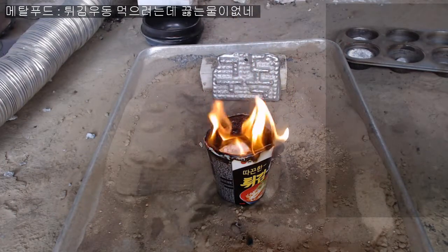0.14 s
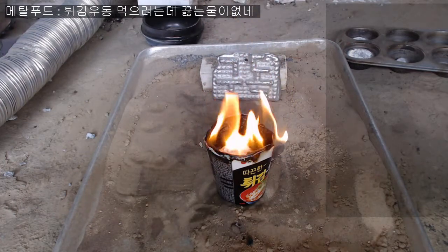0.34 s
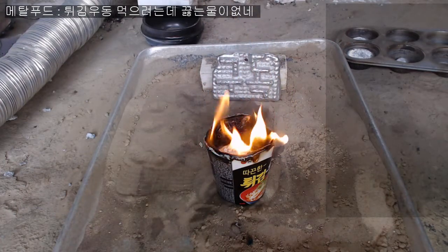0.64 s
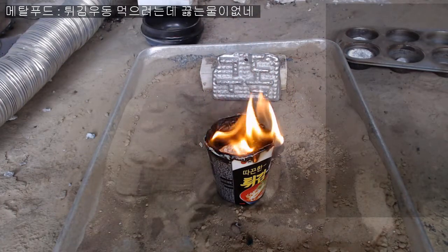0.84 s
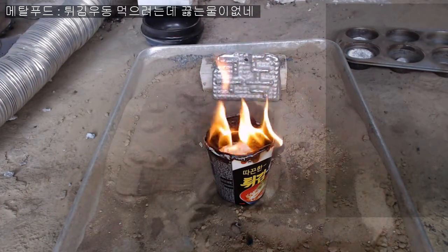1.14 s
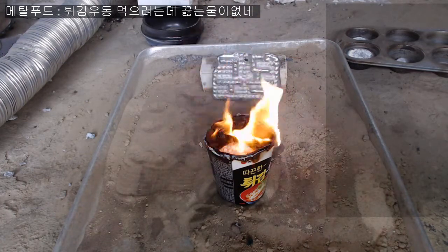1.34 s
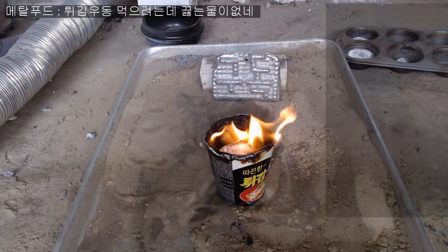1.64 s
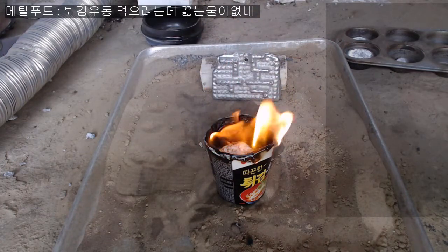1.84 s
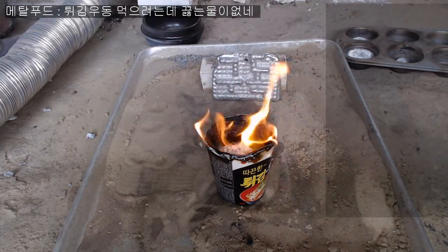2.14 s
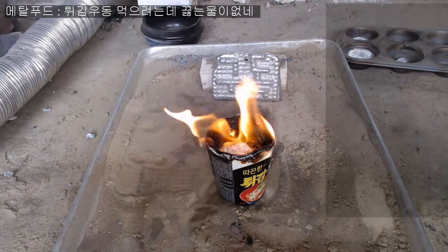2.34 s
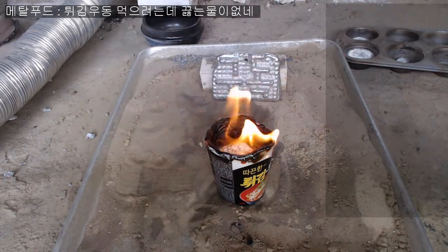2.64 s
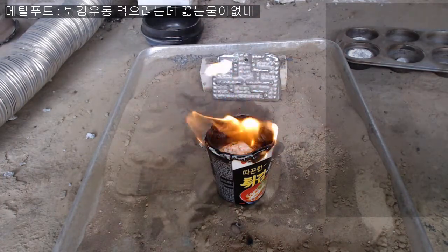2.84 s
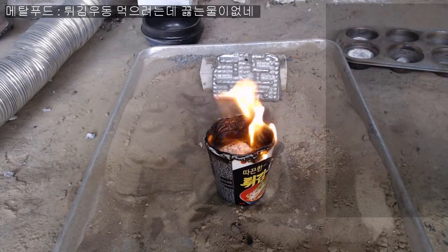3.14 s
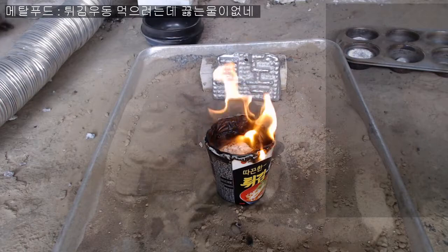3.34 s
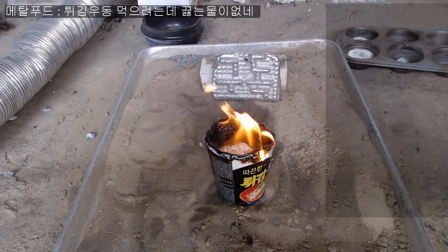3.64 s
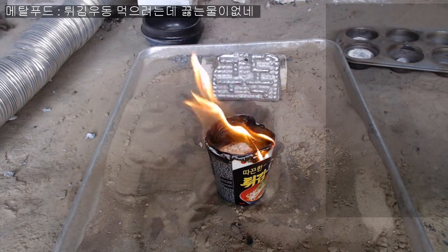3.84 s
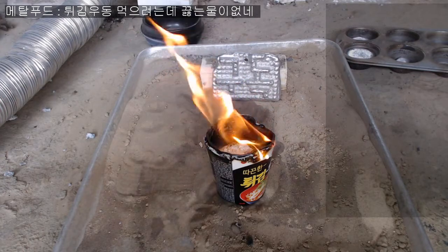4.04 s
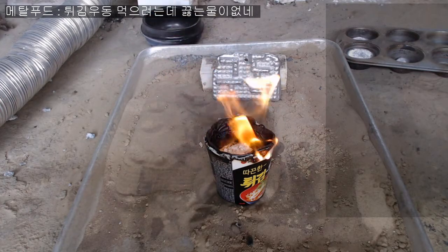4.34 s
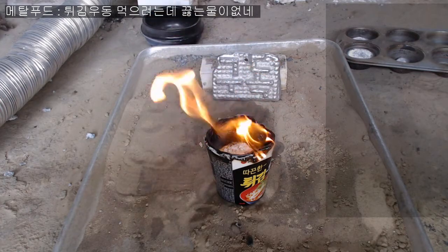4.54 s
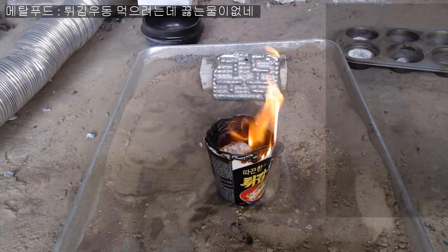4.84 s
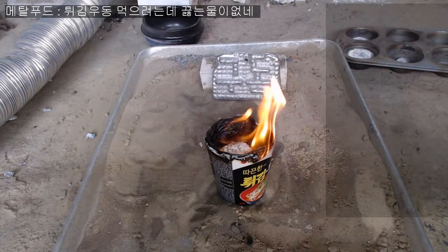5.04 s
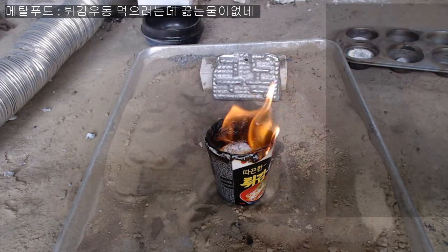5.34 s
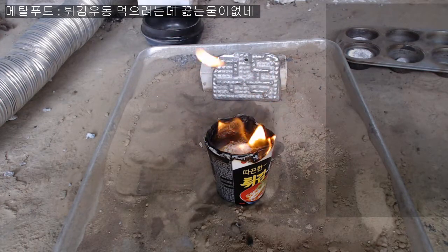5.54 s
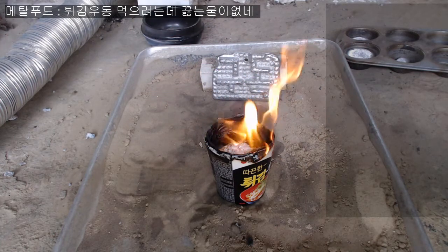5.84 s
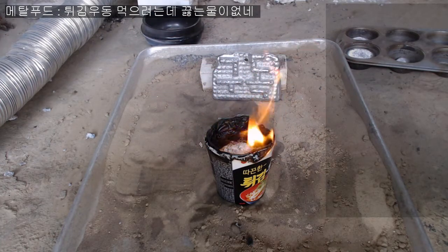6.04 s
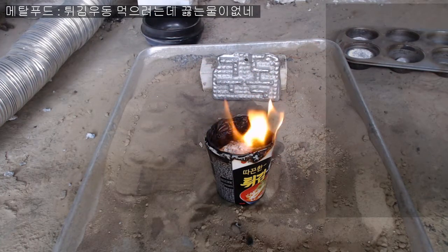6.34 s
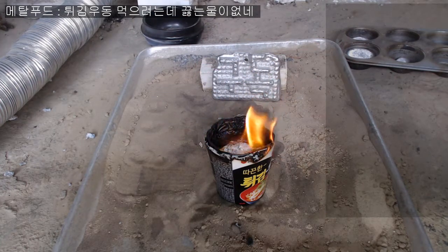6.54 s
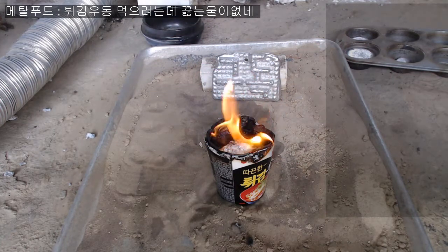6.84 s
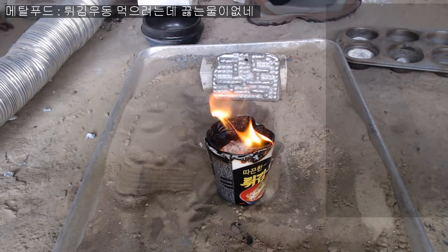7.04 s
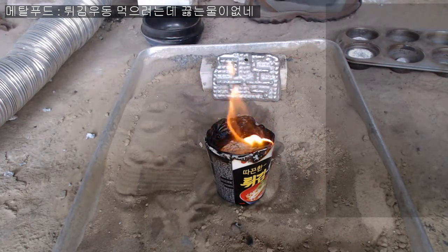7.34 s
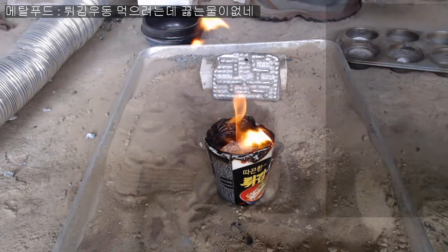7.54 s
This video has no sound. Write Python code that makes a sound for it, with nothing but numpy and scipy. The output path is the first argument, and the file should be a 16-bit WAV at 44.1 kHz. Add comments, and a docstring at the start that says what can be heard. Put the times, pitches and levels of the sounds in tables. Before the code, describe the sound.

Close hollow scraping and knocking gives way to scattered pops of burning paper, soft sandy footsteps and rattling tongs in a shed.

```python
"""A hollow vessel scrapes and bumps close by, its body ringing as it sticks and slips on the ground.
Then, off to one side, metal tongs rattle and clank, and shoes crunch as they press on sand.
A paper cup of molten metal burns in a sand tray, ticking and snapping as its fibres burst.
Behind it all are the steady noise of a shed, a mains hum, a low rumble and one faint falling whistle.
The shed walls add a short echo."""
import sys
import numpy as np
from scipy import signal
from scipy.fft import rfft, irfft
from scipy.io import wavfile
from scipy.ndimage import uniform_filter1d

SR = 44100
rng = np.random.default_rng(int(sys.argv[2]) if len(sys.argv) > 2 else 0)


def unload_audio(sound):
    """Save the sound as a 16-bit wav file, at the path given as the first command line argument."""
    columns = np.transpose(np.atleast_2d(sound))
    # keep every value between -1 and 1, then stretch to whole-number steps
    steps = np.round(np.clip(columns, -1, 1) * 32767)
    wavfile.write(sys.argv[1], SR, steps.astype(np.int16))


N = 339129
T = np.arange(N) / SR

# How loud the dragging is (time [s], level [dB])
DRAG_LEVELS = [(0.0, -17), (0.142, -39.5), (0.212, -25.5), (0.292, -43), (0.662, -31.5), (0.942, -39.5),
               (0.988, -23.5), (1.04, -33), (1.102, -29.5), (1.182, -42), (1.296, -52), (1.392, -35),
               (1.7, -75.5)]
# Notes of the hollow body (pitch [Hz], width [Hz], level [dB])
BODY_NOTES = [(192, 57, -10.5), (289.7, 15, -1), (387, 53, -5), (433.2, 12.8, 3.5), (531.8, 21, 1),
              (666, 29, -9.5), (672, 38, -5.5), (909, 54, -13.5), (998, 21, -10), (1172, 130, -20),
              (1427, 15, -20)]
# Tone of the scraping hiss (frequency [Hz], level [dB])
SCRAPE_TONE = [(760, -42.5), (1300, -1), (1390, -1.5), (2370, -5.5), (2780, -3.5), (4340, -9.5), (5210, -8),
               (7000, -10.5), (9100, -42), (15400, -120)]
# The rim catches on the ground (time [s], level [dB], fade time [s], favoured pitch [Hz])
RIM_CATCHES = [(0.199, -45.5, 0.11, 1750), (0.341, -52.5, 0.4, 5800), (.347, -56, 0.99, 1360),
               (0.489, -51.5, 0.16, 5630), (0.5107, -46, 0.14, 2300), (0.621, -48, 0.39, 5300),
               (0.658, -54.5, 0.25, 2300), (0.841, -49, 0.24, 2300), (0.9733, -36.5, 0.21, 5200),
               (1.1734, -53, 0.22, 1790), (1.35, -48.5, 0.2, 1450)]
# Notes of the rim (pitch [Hz], width [Hz], level [dB])
RIM_NOTES = [(1400, 110, 15), (1750, 120, 14), (2350, 140, 15), (5150, 200, 12), (5800, 170, 12),
             (6400, 170, 14)]
def vessel_drag():
    """Sticking and slipping shakes the hollow body; the rim hisses, catches and rings briefly."""
    stop = np.clip((DRAG_LEVELS[-1][0] - T) / 0.081, 0, 1)
    slips = grains(per_s=3000, spread_db=1.8)
    body = unit(sum((-1) ** k * undb(db) * band(slips, hz, width)
                    for k, (hz, width, db) in enumerate(BODY_NOTES)))
    hiss = unit(colour(grains(6000, 0.54), SCRAPE_TONE))
    out = stop * loudness(DRAG_LEVELS) * (body + undb(-24) * hiss)
    for s, db, fade_s, favoured_hz in RIM_CATCHES:
        at, envelope = swell(s, 0.0018, fade_s)
        rings = 0
        for hz, width, note_db in RIM_NOTES:
            octaves_away = np.log2(hz / favoured_hz)
            rings += undb(note_db - 6.7 * (octaves_away / 0.22) ** 2) * band(hiss[at], hz, width)
        out[at] += undb(db) * envelope * (1.3 * hiss[at] + rings)
    return out


# Knocks on the vessel (time [s], level [dB], favoured pitch [Hz], deep note's relative level [dB])
VESSEL_BUMPS = [(0.014, -21.5, 434, -15.5), (0.045, -14.5, 511, -32), (0.167, -23.5, 434, -18),
                (0.201, -17.5, 434, -10.5), (0.239, -24, 434, -11.5), (0.393, -35, 495, -1.5),
                (0.435, -28.5, 434, -11), (0.512, -22.5, 434, -20), (0.583, -17, 511, -35),
                (0.623, -30.5, 514, -19), (0.659, -20.5, 434, -5), (0.707, -29.5, 511, -19),
                (0.779, -26, 434, -26), (0.973, -25, 434, -18), (0.994, -38, 434, -9),
                (1.054, -34.5, 511, 6), (1.085, -21, 434, 3), (1.11, -26.5, 434, 6.5),
                (1.272, -33, 368, -5), (1.298, -31.5, 370, -1), (1.352, -30, 366, -3),
                (1.384, -33.5, 365, -5)]
def vessel_bumps():
    """A soft bump rings the body's notes nearest the favoured pitch, plus one deep note."""
    out = np.zeros(N)
    for s, db, favoured_hz, deep_db in VESSEL_BUMPS:
        at, envelope = swell(s, rise_s=0.0036, fade_s=0.091, hold_s=0.0072)
        turn = 2 * np.pi * (T[at] - s)
        rings = sum(np.exp(-((hz - favoured_hz) / 35) ** 2) * np.sin(hz * turn)
                    for hz in (367, 435.5, 517))
        out[at] += undb(db) * envelope * (rings + undb(deep_db) * np.sin(295.6 * turn))
    return out


# Hits of the tongs (time [s], level [dB], clash fade time [s], boosted pitch [Hz])
TONG_CLANKS = [(1.95, -16.5, 0.12, 4560), (2.005, -34, 0.17, 5030), (5.365, -7.5, 0.14, 3940),
               (5.3808, -15, 0.18, 6400), (5.4065, -23, 0.15, 5030), (5.596, -2.5, 0.051, 3570),
               (5.613, -10, 0.14, 5800), (5.6417, -15, 0.14, 4630), (5.8006, -9, 0.097, 5050),
               (5.814, -18.5, 0.24, 6600), (5.862, -25, 0.15, 4300), (6.108, -24.5, 0.16, 3300),
               (6.137, -31.5, 0.19, 3900)]
# Notes of the tongs (pitch [Hz], level [dB], fade time before damping [s])
TONG_NOTES = [(2300, -14, .17), (3240, -12, .12), (3360, -10, .19), (3640, -12, .2), (3924, -13, .25),
              (4035, -10, .2), (4160, -13, .19), (4620, -13, .25), (5010, -8, .2), (5052, -5, .12),
              (5206, -11, .16), (5680, -8, .2), (5720, -3, .13), (5900, -6, .17), (6290, -5, .13),
              (6492, -10, .17), (6686, -3, .1), (6890, -12, .2), (7230, -17, 1.4), (11200, -17, .6)]
# Tone of the noisy clash (frequency [Hz], level [dB])
CLASH_TONE = [(180, -52), (300, -16), (366, -27.5), (688, -17.5), (1520, -16.5), (2280, -18.5),
              (2570, -11.5), (5380, -10.5), (5670, -16.5), (7000, -9.5), (9100, -34), (15400, -120)]
def tongs(damping=0.49):
    """Each clank is a quick rattle of metal on metal: clear ringing notes inside a noisy clash."""
    notes, clash_level = np.zeros((2, N))
    rattle = grains(3500, 0.37)
    # where the tongs are struck sets each note's share
    shares_db = 4 * rng.standard_normal((len(TONG_CLANKS), len(TONG_NOTES)))
    for (s, db, fade_s, boosted_hz), shares in zip(TONG_CLANKS, shares_db):
        at, envelope = swell(s, 0.00035, fade_s, hold_s=0.009)
        clash_level[at] += undb(db) * envelope
        at, envelope = swell(s, 0.00059, 0.58)
        hits = envelope ** 30 * rattle[at]  # the power cuts the rattle short
        for (hz, note_db, ring_s), share_db in zip(TONG_NOTES, shares):
            boost_db = 8 * np.exp(-((hz - boosted_hz) / 500) ** 2)
            notes[at] += undb(db + note_db + share_db + boost_db) * ring(hits, hz, damping * ring_s)
    weak_hz = rng.uniform(1200, 8000, 60)  # many weaker notes make the clash metallic
    clashes = []
    for k in range(3):
        noise = colour(grains(12000, 1.0), CLASH_TONE)
        shimmer = sum(band(noise, hz, 32) for hz in weak_hz[k::3])
        clashes.append(clash_level * unit(noise + 1.67 * shimmer))
    shared, left, right = clashes
    notes -= band(notes, 600, 1700)  # thin out the low tones
    placed = stereo(undb(-34.5) * notes + undb(-15) * shared, lag=8.6, left_db=-.3)
    # the long tool sounds from many spots, so left and right partly differ
    return placed + undb(-14.5) * np.array([left, right])


# Shoes on sand (time [s], crunch level [dB], crunch pitch [Hz], thud level [dB],
# thud pitch [Hz], press length [s])
FOOTSTEPS = [(2.067, -55, 1160, -60, 302, 0), (2.294, -51.5, 990, -56, 377, 0.052),
             (2.41, -65, 900, -55, 202, 0), (2.569, -69.5, 556, -54, 218, 0.16),
             (2.717, -42, 830, -43.5, 190, 0.0034), (2.753, -59.5, 695, -44.5, 306, 0.04),
             (2.828, -58.5, 1360, -48, 315, 0.042), (3.679, -57.5, 1160, -43.5, 330, 0.017),
             (3.721, -44, 1200, -42.5, 360, 0.023), (3.762, -55.5, 2140, -50, 355, 0.015),
             (4.04, -62, 666, -49, 409, 0.055), (4.111, -58, 950, -49.5, 280, 0.026),
             (4.285, -53, 670, -36, 186, 0.019), (4.566, -62, 724, -71, 298, 0.0029),
             (4.862, -84, 960, -49.5, 200, .01), (5.742, -71, 800, -53, 106, .01),
             (6.015, -56.5, 830, -45.5, 117, 0.083), (6.058, -58.5, 1200, -46, 270, 0.09),
             (6.843, -53, 885, -32, 169, 0), (6.857, -54.5, 950, -41, 96.6, 0.01),
             (6.885, -50.5, 1300, -45.5, 94, 0.079), (6.991, -38, 2400, -34, 430, 0),
             (7.162, -60, 2640, -62, 97, 0.077), (7.413, -65, 600, -52, 299, 0.072),
             (7.55, -56, 1710, -59, 97, 0.027)]
def footsteps():
    """A sole presses sand: a rough thud, a coarse crunch as the weight comes down, and fine grit."""
    coarse = grains(3500, 1.1)
    crunch = unit(band(coarse, 1600, 2140))
    grit = unit(band(grains(6700, 7.8), 3000, 3600))
    lumps = unit(band(grains(600, 0.96), 206, 350))
    sand = 0.71 * crunch + undb(-10) * grit
    out = np.zeros(N)
    for s, db, hz, thud_db, thud_hz, press_s in FOOTSTEPS:
        at, envelope = swell(s, 0.0005, 0.12, press_s)
        own_crunch = unit(band(band(coarse[at], hz, 0.94 * hz), hz, 2.2 * hz))
        out[at] += undb(db) * envelope * (sand[at] + own_crunch)
        at, envelope = swell(s, 0.0024, 21 / thud_hz)  # fades in 21 cycles
        thud = 0.83 * lumps[at] - np.sin(2 * np.pi * thud_hz * (T[at] - s))
        out[at] += undb(thud_db) * envelope * thud
    return out


# Loudest snaps of the burning paper (time [s], level [dB], pitch [Hz])
PAPER_SNAPS = [(2.376, -43, 4780), (2.4935, -38, 3270), (2.7218, -34.5, 3640), (2.7547, -39.5, 6050),
               (2.8333, -36, 5560), (3.0006, -43, 5850), (3.1103, -44, 6110), (3.1579, -26, 5600),
               (3.3462, -45, 5800), (3.4693, -30.5, 4460), (3.762, -32, 2950), (3.911, -27, 4370),
               (3.9215, -21, 2750), (3.9649, -44, 5060), (3.991, -32.5, 3400), (4.0782, -32.5, 6900),
               (4.6993, -45, 6800), (4.8685, -48, 5970), (6.01, -36, 6000), (6.024, -42, 3280),
               (6.545, -46, 7000), (6.7105, -43, 5500), (6.795, -35, 5100), (7.1826, -35.5, 3600),
               (7.3292, -39, 4280), (7.3478, -22, 2900), (7.5762, -35.5, 2780)]
def flame(ticks_per_s=50, length=400):
    """Paper fibres burst in dry cracks with a brief ring; many weaker ticks fall at random."""
    when, softness, pitch = rng.random((int(ticks_per_s * N / SR), 3)).T
    ticks = np.c_[when * T[-1], -52 - 9 * softness, 3500 + 4000 * pitch]
    bursts = np.vstack([PAPER_SNAPS, ticks])
    out, click = np.zeros(N + length), signal.unit_impulse(length)
    thin_noise = np.diff(rng.standard_normal((len(bursts), length + 1)))  # little bass
    splinters = thin_noise * undb(-60 * T[:length] / .007)
    for (s, db, hz), splinter in zip(bursts, splinters):
        crack = band(band(splinter, hz, 0.84 * hz), hz, 0.9 * hz)
        out[int(s * SR):][:length] += undb(db) * (0.93 * ring(click, hz, 3 / hz) + 1.78 * crack)
    return out[:N]


# Tone of the shed's steady noise (frequency [Hz], level [dB])
SHED_TONE = [(26, -30), (45, -4.5), (70, -8), (87, -15), (283, -19.5), (328, -17), (364, -21.5), (489, -18),
             (532, -18), (731, -23), (1290, -28.5), (7000, -40.5), (9100, -70), (15400, -120)]
# How alike left and right are (frequency [Hz], likeness [0 to 1])
SHED_LIKENESS = [(60, 1), (120, 1), (240, 0.77), (490, 1), (980, 0.097), (1960, 0.13), (3930, 0.19),
                 (7900, 0.49)]
def shed_noise():
    """A steady rush of noise bands, each flickering a little and partly alike on both sides."""
    out = 0
    for hz in 50 * 2 ** np.arange(0, 7.6, 1 / 3):
        alike = min(look_up(SHED_LIKENESS, hz), .99)
        mid, side = band(band(rng.standard_normal((2, N)), hz, hz / 3), hz, hz / 3)
        pair = np.sqrt(1 + alike) * mid + np.sqrt(1 - alike) * np.array([side, -side])
        out += undb(look_up(SHED_TONE, hz) + 1.2 * wander(6)) * pair
    return undb(-56.5) * unit(out)


def mains_hum(hz=59.5):
    """One low electrical tone that wavers in level and pitch."""
    level = undb(-56.5 + 0.79 * wander(9.5))
    return level * np.sin(2 * np.pi * np.cumsum(hz + 0.59 * wander(20)) / SR)


# Rumble at the microphone (time [s], left level [dB])
RUMBLE_LEVELS = [(0.0, -58), (0.19, -65.5), (0.62, -54.5), (1.56, -43), (1.63, -52.5), (1.82, -40),
                 (1.95, -58), (3.6, -61.5), (7.69, -62.5)]
def rumble():
    """Very deep noise that swells and sinks, stronger on the right."""
    sides = [undb(db) * unit(band(band(rng.standard_normal(N), 29, 39), 29, 39)) for db in (0, 4)]
    return loudness(RUMBLE_LEVELS) * np.array(sides)


def whistle(start_s=4.36, length_s=.38, hz=1510, fall_hz_per_s=270):
    """A faint, fluttering tone that slides down."""
    at, envelope = swell(start_s, 0.0092, 3.1)
    t, out = T[at] - start_s, np.zeros(N)
    level = undb(-69.5 + 2.9 * wander(24.7)[at]) * envelope * (t < length_s)
    out[at] = level * np.sin(2 * np.pi * t * (hz - fall_hz_per_s * t / 2))
    return out


def wall_echo(x, fade_s=.25):
    """The shed walls scatter sound into a short tail, different on each side."""
    t = T[:SR // 2]
    tail = rng.standard_normal((2, len(t))) * undb(-60 * t / fade_s) * (t > .004)
    tail /= np.sqrt(np.sum(tail ** 2) / 2)
    return undb(-12) * signal.fftconvolve(x[None], tail, axes=1)[:, :N]


def undb(db):
    """Turn decibels into a gain."""
    return 10 ** (np.asarray(db) / 20)


def unit(x):
    """Scale to an average (rms) strength of 1."""
    return x / np.sqrt(np.mean(x ** 2))


def loudness(table):
    """A gain that glides through (time [s], level [dB]) points."""
    return undb(np.interp(T, *np.transpose(table)))


def look_up(table, hz, top_hz=7000):
    """Read a table along a musical pitch scale; the value stays the same above top_hz."""
    frequencies, values = np.transpose(table)
    return np.interp(np.log(np.minimum(hz, top_hz) + 1), np.log(frequencies + 1), values)


def colour(x, table, top_hz=7000):
    """Shape the tone of x with a (frequency [Hz], level [dB]) table, read up to top_hz."""
    gain_db = look_up(table, np.linspace(0, SR / 2, 2049), top_hz)
    cepstrum = irfft(gain_db * np.log(10) / 20)
    # fold it so the filter never sounds ahead of its input
    cepstrum[1:2048] *= 2
    cepstrum[2049:] = 0
    return signal.lfilter(irfft(np.exp(rfft(cepstrum)))[:512], [1], x)


def band(x, hz, width_hz):
    """Keep the sound near one pitch."""
    return signal.lfilter(*signal.iirpeak(min(hz, .45 * SR), hz / width_hz, fs=SR), x)


def ring(x, hz, fade_s):
    """One note, struck by x, that fades by 60 dB in fade_s."""
    pole = np.exp(2j * np.pi * hz / SR - np.log(1000) / (fade_s * SR))
    return signal.lfilter([1], [1, -pole], x).imag


def wander(per_s):
    """A smooth random drift."""
    hold = int(SR / per_s)
    levels = np.repeat(rng.standard_normal(N // hold + 1), hold)
    return 2.08 * uniform_filter1d(uniform_filter1d(levels, hold), hold)[:N]


def grains(per_s, spread_db):
    """Scattered clicks of uneven size."""
    clicks = (rng.random(N) < per_s / SR) * rng.standard_normal(N)
    return unit(clicks * undb(spread_db * rng.exponential(size=N)))


def swell(start_s, rise_s, fade_s, hold_s=0):
    """Place and shape of a sound that rises, holds, then fades by 60 dB."""
    held_until = rise_s + hold_s
    at = slice(int(start_s * SR), min(N, int((start_s + held_until + fade_s) * SR)))
    t = T[at] - T[at][0]
    return at, np.minimum(np.minimum(t / rise_s, 1), undb(-60 * (t - held_until) / fade_s))


def stereo(x, lag, left_db):
    """The right side hears x `lag` samples later; left_db is left's level against right's."""
    late = np.interp(np.arange(N) - lag, np.arange(N), x)
    return np.array([undb(left_db / 2) * x, late / undb(left_db / 2)])


def scene():
    """Place the sources left and right, then add the echo and the background."""
    vessel = vessel_drag() + vessel_bumps()
    metal, feet, fire = tongs(), footsteps(), flame()
    direct = stereo(vessel, 0.12, -1.3) + metal + stereo(feet, 5.47, -2.9) + stereo(fire, 0.16, -1.5)
    # the vessel is close, so it gets less echo
    echo = wall_echo(undb(-11) * vessel + metal.mean(0) + undb(5.5) * feet + fire)
    steady, low = shed_noise() + mains_hum(), rumble()
    balance = np.array([[.85], [1.1]])  # left, right
    return direct + echo + balance * (steady + whistle()) + low


# Tone of the microphone (frequency [Hz], gain [dB])
MIC_TONE = [(20, 3.5), (6900, 2.5), (7500, -3), (8200, -12.5), (8700, -26), (10500, -24), (14000, -43.5)]
def record(dry):
    """The treble narrows to the centre and falls away above 8 kHz; the very top is cut."""
    mid = (dry[0] + dry[1]) / 2
    side = signal.lfilter(*signal.butter(2, 6500, fs=SR), dry[0] - dry[1]) / 2
    coloured = colour(np.array([mid + side, mid - side]), MIC_TONE, top_hz=SR)
    return signal.sosfilt(signal.ellip(8, .2, 70, 14500, fs=SR, output="sos"), coloured)


dry = scene()
out = record(dry)
unload_audio(out)
```